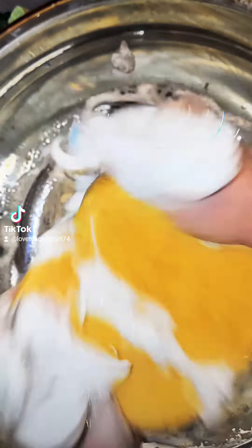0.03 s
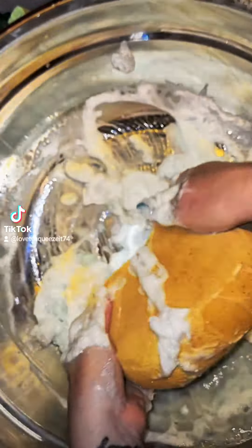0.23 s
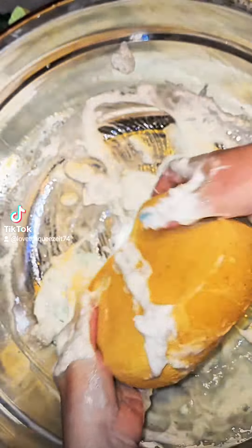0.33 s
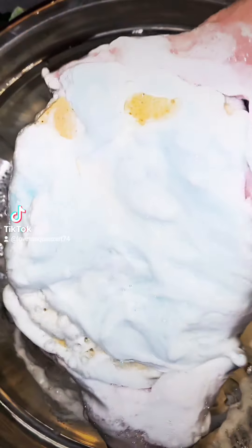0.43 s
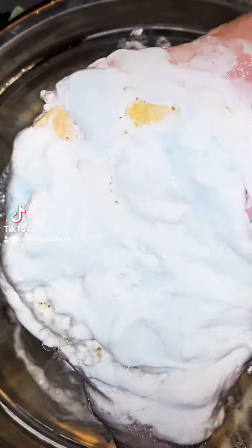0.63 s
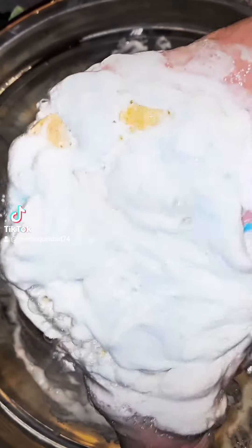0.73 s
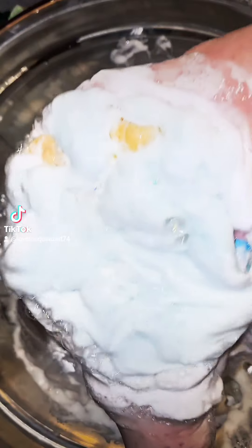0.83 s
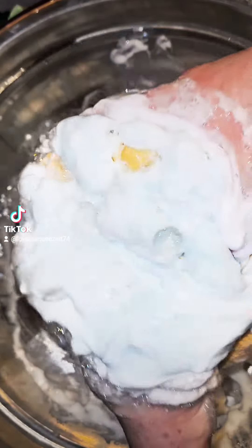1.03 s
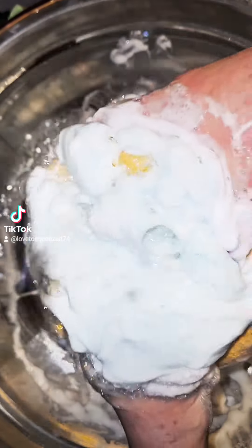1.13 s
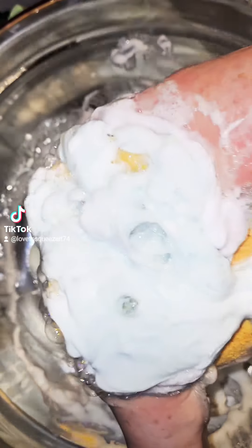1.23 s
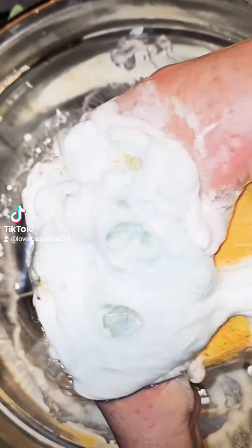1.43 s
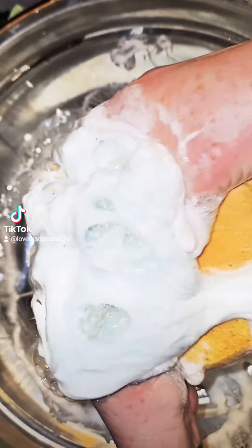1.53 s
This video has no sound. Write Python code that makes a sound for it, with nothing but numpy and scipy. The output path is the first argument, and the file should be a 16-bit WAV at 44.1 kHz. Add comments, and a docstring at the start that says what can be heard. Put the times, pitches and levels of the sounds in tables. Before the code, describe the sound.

Soapy sponge worked by hand: one wet slop, then soft fizzing foam and small pops.

```python
"""A sponge full of soap foam is worked by hand over a bowl, very close to the microphone. First the foam hisses
over a soft rumble of hands, a faint mains hum and two wavering tones. At 0.22 s the sponge slops into the suds
with a spray and a low gurgle; at 0.3 s the spray, gurgle and tones break off at once. A slow squeeze follows:
thousands of tiny bubbles fizz and a few bigger ones pop. From about 1 s trapped air squelches out, and near the
end the wet sponge groans."""
import sys
import numpy as np
from scipy import signal
from scipy.fft import rfft, irfft, next_fast_len
from scipy.io import wavfile
from scipy.ndimage import map_coordinates

SR = 44100
rng = np.random.default_rng(int(sys.argv[2]) if len(sys.argv) > 2 else 0)


def generate_wav(sig):
    """Save sig (samples, or channels by samples) to the path in sys.argv[1] as 16-bit PCM at SR."""
    pcm = np.round(np.clip(np.atleast_2d(sig).T, -1, 1) * 32767).astype(np.int16)
    wavfile.write(sys.argv[1], SR, pcm)


N = 70560
LEFT_LEAD_S = .00015  # sound reaches the microphone's left opening this much sooner


def amp(db):
    return 10 ** (np.asarray(db) / 20)


def unit(x):
    return x / np.sqrt(np.mean(x ** 2) + 1e-20)


def clock():
    return np.arange(N) / SR


def curve(rows):
    """Join (time_s, value) points with straight lines."""
    return np.interp(clock(), *np.transpose(rows))


def wobble(turns_per_s):
    """A smooth random curve."""
    return map_coordinates(rng.standard_normal(int(N * turns_per_s / SR) + 4), [clock() * turns_per_s])


def pan(db):
    """Left and right gains that make the left side db louder."""
    return amp(np.array([[.5], [-.5]]) * db)


def coloured(x, colour):
    """Turn each pitch up or down, following (pitch_hz, gain_db) points."""
    size = 2 * next_fast_len(N)
    hz, db = np.transpose(colour)
    gain = amp(np.interp(np.log(np.fft.rfftfreq(size, 1 / SR) + 1), np.log(hz + 1), db))
    # fold the filter so that it rings only after a sound, never before
    cepstrum = irfft(np.log(gain))
    cepstrum[1:size // 2] *= 2
    cepstrum[size // 2 + 1:] = 0
    return irfft(rfft(x, size) * np.exp(rfft(cepstrum)), size)[..., :N]


def noise(colour):
    return unit(coloured(rng.standard_normal(N), colour))


def wide_noise(colour):
    """Stereo noise: a direct part that arrives on the left first, plus reflections from the bowl."""
    direct = noise(colour)
    pair = np.array([direct, np.roll(direct, round(LEFT_LEAD_S * SR))])
    reflections = np.array([noise(colour), noise(colour)])
    return unit(pair + amp(5) * reflections)


def clicks(times, sizes, delay_s):
    """Sharp stereo clicks, delayed on the right."""
    return np.array([np.bincount(np.round(t * SR).astype(int) % N, sizes, N)
                     for t in (times, times + delay_s)])


def burst(start_s, fade_s, attack_s):
    """A level that rises quickly, then falls 60 dB every fade_s."""
    age = np.maximum(clock() - start_s, 0)
    return (1 - np.exp(-age / attack_s)) * np.exp(-np.log(1000) * age / fade_s)


def air_pocket(start_s, hz, glide_per_s):
    """The tone of an air pocket changing size: its pitch slides for 0.1 s, then holds."""
    age = np.maximum(clock() - start_s, 0)
    slide = np.exp(glide_per_s * np.minimum(age, .1))
    return np.sin(2 * np.pi * hz * np.cumsum((age > 0) * slide) / SR)


def wet_bubbles(per_s=990, middle_hz=2285, spread_octaves=1.252, ring_cycles=17):
    """Wet bubbles ring briefly, each with its own pitch, size and place."""
    when, up, down, size, place = rng.random((int(per_s * N / SR), 5)).T[:, :, None]
    hz = middle_hz * 2 ** (spread_octaves * (up - down))
    steps = np.arange(1024)
    cycles = hz * steps / SR
    rings = size * np.sqrt(hz) * np.sin(2 * np.pi * cycles) * np.exp(-np.pi * cycles / ring_cycles)
    at = ((when * N).astype(int) + steps).ravel()
    sides = [np.bincount(at, (rings * np.sqrt(share)).ravel(), N)[:N] for share in (place, 1 - place)]
    return unit(np.array(sides))


# How loudly the foam fizzes: time_s, level_db
FOAM_LEVEL = [(0, -67.5), (.044, -82), (.062, -65.5), (.115, -62.5), (.19, -51.5), (.22, -45.5),
              (.3, -51.5), (.306, -65.5), (.355, -73.5), (.41, -69), (.425, -64.5), (.515, -64.5),
              (.56, -58), (.7, -53), (.785, -55.5), (.85, -55), (1.11, -54), (1.15, -61), (1.18, -54),
              (1.32, -55.5), (1.41, -54), (1.6, -58)]
# The tone of the fizz: pitch_hz, gain_db
FOAM_COLOUR = [(100, -7.5), (340, 1.5), (520, -5), (800, -2.5), (1250, 2.5), (1900, -4), (3300, 2.5),
               (5500, -1.5), (7500, -2), (13000, -1.5)]
def foam(bursts_per_s=6000, size_spread_db=3.5, flutter_db=.7):
    """Tiny bubbles burst at random: the smallest blend into a hiss, the wettest ring."""
    level = amp(curve(FOAM_LEVEL) + flutter_db * wobble(44.85))
    hiss = wide_noise(FOAM_COLOUR)
    bursts = (rng.random(N) < bursts_per_s / SR) * rng.choice([-1, 1], N)
    sizes = amp(size_spread_db * np.minimum(rng.exponential(size=N), 5))
    delays_s = LEFT_LEAD_S + .00006 * rng.standard_normal(N)
    crackle = unit(coloured(clicks(clock(), bursts * sizes, delays_s), FOAM_COLOUR))
    return level * unit(crackle + amp(-2) * hiss + amp(-13.5) * wet_bubbles())


# Extra treble from finer bubbles: time_s, boost_db
TREBLE_BOOST = [(0, -1), (.06, 12.5), (.2, 5.5), (.45, 3.5), (.7, 1), (1.6, 3)]
def light_press(x, above_hz=5300):
    """Lightly pressed foam bursts more finely, so it sounds brighter."""
    treble = signal.sosfiltfilt(signal.butter(2, above_hz, "high", fs=SR, output="sos"), x)
    return x + (amp(curve(TREBLE_BOOST)) - 1) * treble


# How loudly the hands rumble: time_s, level_db
RUMBLE_LEVEL = [(0, -58), (.05, -68.5), (.095, -67), (.155, -64), (.21, -66), (.3, -46), (.31, -70),
                (.55, -75.5), (.7, -74), (1.3, -74), (1.6, -68.5)]
# The tone of the rumble: pitch_hz, gain_db
RUMBLE_COLOUR = [(20, -12), (55, -11.5), (130, -6), (280, -16), (420, -16), (600, -29.5), (2000, -38.5),
                 (8000, -78)]
def hands():
    """Handling the sponge makes a low rumble."""
    return amp(curve(RUMBLE_LEVEL)) * noise(RUMBLE_COLOUR)


# The two notes of the hum: pitch_hz, gain_db
HUM_NOTES = [(59.3, 0), (118.6, -9)]
# How loud the hum is: time_s, level_db
HUM_SWELL = [(0, -53), (.05, -67.5), (.09, -76), (.155, -52.5), (.2, -63), (.34, -67), (.47, -68.5),
             (.53, -78.5), (.63, -66.5), (1.23, -68), (1.29, -73), (1.53, -66)]
def mains_hum():
    """Mains electricity hums faintly, swelling and dipping."""
    notes = sum(amp(db) * np.sin(2 * np.pi * (hz * clock() + rng.random())) for hz, db in HUM_NOTES)
    return np.sqrt(2) * amp(curve(HUM_SWELL)) * notes


GURGLE_STOP_S = .3044
# Two quiet background tones: pitch_hz, level_db
FAINT_TONES = [(380, -73), (462, -72.5)]
def faint_tones(waver=.019):
    """Two tones waver in pitch and stop with the gurgle."""
    tones = sum(amp(db) * np.sin(2 * np.pi * np.cumsum(hz * (1 + waver * wobble(67))) / SR)
                for hz, db in FAINT_TONES)
    return np.sqrt(2) * tones * (clock() < GURGLE_STOP_S)


# Jets of suds: start_s, level_db, fade_s
JETS = [(0.22, -15.5, 0.025), (0.2243, -14, 0.0088), (0.227, -19.5, 0.052), (0.2392, -23, .03),
        (0.2469, -27, 0.053), (0.276, -36.5, 0.047)]
# The tone of the jets: pitch_hz, gain_db
JET_COLOUR = [(100, 5.5), (450, -5), (700, 1), (1000, 3.5), (1700, -2.5), (3500, 6), (5500, 0),
              (8000, -0.5), (13000, 6)]
def spray(grain_db=1.8, grains_per_s=1100):
    """The sponge lands and suds shoot out, grainy with droplets."""
    jets = sum(amp(db) * burst(start, fade, attack_s=.0005) for start, db, fade in JETS)
    return wide_noise(JET_COLOUR) * jets * unit(amp(grain_db * wobble(grains_per_s)))


# Big air pockets: start_s, pitch_hz, level_db, fade_s
BIG_POCKETS = [(0.2208, 232.7, -11.9, 0.073), (0.2218, 326.7, -16.5, 0.049), (.222, 669, -31, 0.052),
               (0.2285, 171, -17, 0.056), (0.2394, 58.6, -37.5, 0.23), (0.2569, 225.5, -18.5, 0.072),
               (0.2693, 108.3, -29.5, 0.13), (0.291, 201, -26.5, 0.25)]
def gurgle():
    """Air pockets ring under the landing sponge, sinking in pitch."""
    return sum(amp(db) * burst(start, fade, attack_s=.007) * air_pocket(start, hz, glide_per_s=-1.04)
               for start, hz, db, fade in BIG_POCKETS)


# Bigger bubbles popping: start_s, level_db
BIG_BUBBLES = [(0.3265, -48), (0.3849, -46.5), (0.4007, -51.5), (.4185, -44), (0.47, -39), (0.6448, -38),
               (0.841, -37), (1.3439, -25.5), (1.487, -41)]
# The tone of a pop: pitch_hz, gain_db
TICK_COLOUR = [(100, -14), (1000, -3), (4000, 4), (8000, 0), (13000, 4)]
def pops(mist_db=-11):
    """Bigger bubbles snap open with a thin tick and a tiny spray."""
    times, levels = np.transpose(BIG_BUBBLES)
    ticks = coloured(clicks(times, amp(levels), LEFT_LEAD_S), TICK_COLOUR)
    mist = sum(amp(db + mist_db) * burst(start, fade_s=.011, attack_s=1 / SR)
               for start, db in BIG_BUBBLES)
    return ticks + mist * wide_noise(TICK_COLOUR)


# Small air pockets: start_s, pitch_hz, tone_db, fade_s, splutter_db
SMALL_POCKETS = [(1.05, 338, -51, 0.069, -55), (1.052, 507, -51, 0.043, -60.5),
                 (1.233, 360, -60, 0.031, -47.5), (1.249, 350, -54, 0.11, -62),
                 (1.343, 200, -54, 0.22, -83), (1.344, 335, -53, 0.082, -74), (1.446, 245, -53, 0.094, -63),
                 (1.477, 217, -69, .09, -69), (1.482, 311, -46, 0.052, -57)]
# The tone of the wet splutter: pitch_hz, gain_db
SPLUTTER_COLOUR = [(40, -14), (150, 5.5), (350, -17), (650, -3), (1200, -8), (4000, -45)]
def squelches():
    """Air pockets splutter and rise in pitch as they leave the squeezed sponge."""
    sound = np.zeros(N)
    for start, hz, tone_db, fade, splutter_db in SMALL_POCKETS:
        tone = amp(tone_db) * air_pocket(start, hz, glide_per_s=.8)
        splutter = amp(splutter_db) * noise(SPLUTTER_COLOUR)
        sound += burst(start, fade, attack_s=.0013) * (tone + splutter)
    return sound


def groan(pitch_hz=121, level_db=-56, waver=.0434):
    """Rubbing the wet sponge makes a short, unsteady groan."""
    phase = 2 * np.pi * np.cumsum(pitch_hz * (1 + waver * wobble(48.17))) / SR
    rub = np.sqrt(curve([(1.33, 0), (1.465, 1), (1.54, 0)]))
    return amp(level_db) * rub * (np.sin(phase) + .21 * np.sin(2 * phase))


# Where the suds are heard: time_s, left_minus_right_db
SUDS_POSITION = [(0, -3), (.3, 0.5), (.6, 1.5), (1.2, 1), (1.35, 2.5), (1.6, 1)]
def scene():
    """Low sounds sit a little to the left; the bright suds drift from right to left."""
    cut_off = np.clip((GURGLE_STOP_S - clock()) / .0046, 0, 1)
    low = groan() + hands() + mains_hum() + faint_tones() + squelches() + gurgle() * cut_off
    bright = spray() * cut_off + light_press(pops() + foam())
    return low * pan(2) + bright * pan(curve(SUDS_POSITION))


TOP_HZ = 16200
# The tone of the microphone's two openings: pitch_hz, left_db, right_db
MIC_COLOUR = [(60, .6, -.6), (1000, 0, 0), (2500, .5, -.5), (4500, 1, -1.5), (7800, 3, -3.5),
              (8400, 1.5, -5), (9100, -9, -15), (10300, -18, -20), (11300, -10, -8), (12200, -2, 4),
              (13200, 0, 6.5), (14300, -2, 3), (15000, -4, -.5), (15700, -9, -6), (16100, -21, -18)]
def record(dry):
    """Each opening has a deep dip and a peak in the treble; nothing above TOP_HZ gets through."""
    mic = np.array(MIC_COLOUR)
    pair = np.array([coloured(dry[0], mic[:, [0, 1]]), coloured(dry[1], mic[:, [0, 2]])])
    size = 2 * next_fast_len(N)
    passes = np.fft.rfftfreq(size, 1 / SR) < TOP_HZ
    return irfft(rfft(pair, size) * passes, size)[:, :N]


dry = scene()
out = record(dry)
generate_wav(out)
```